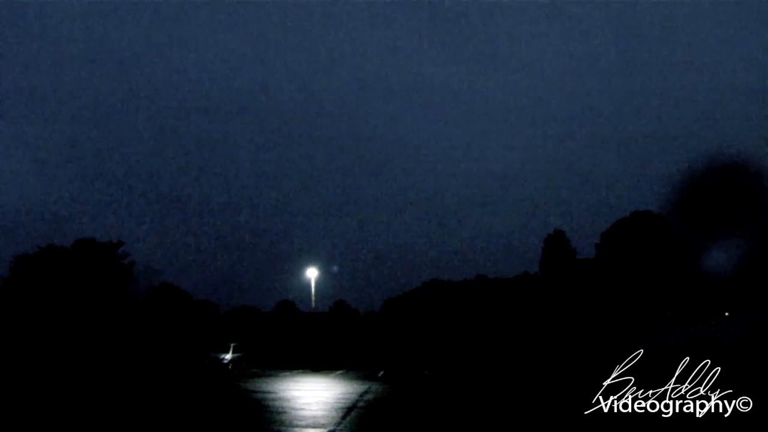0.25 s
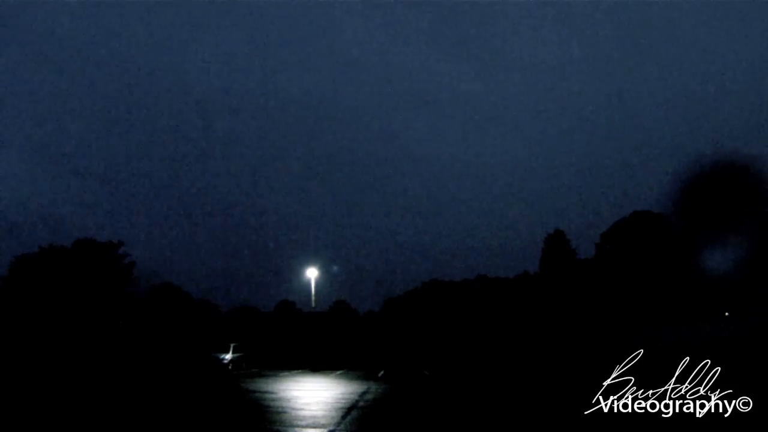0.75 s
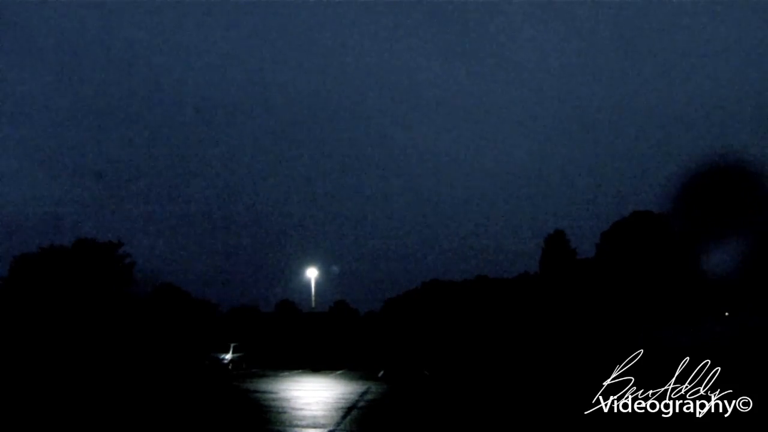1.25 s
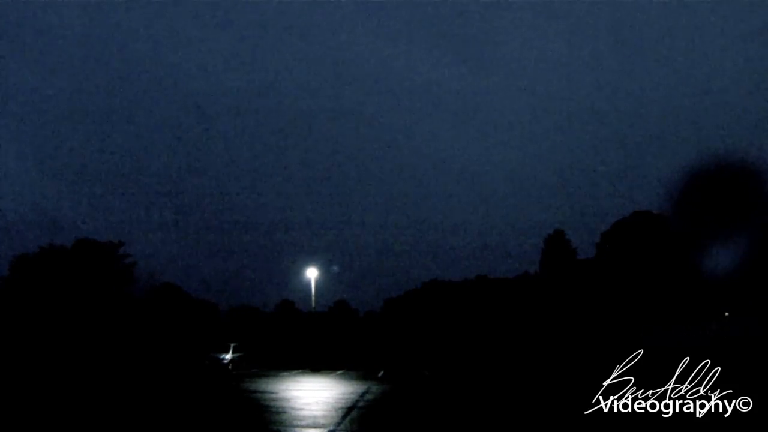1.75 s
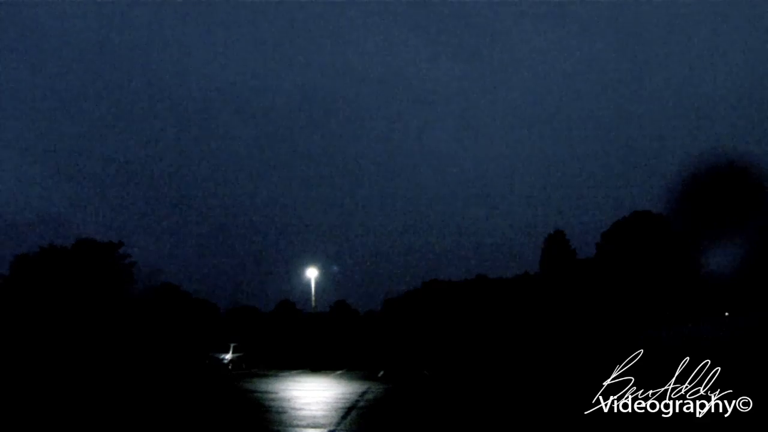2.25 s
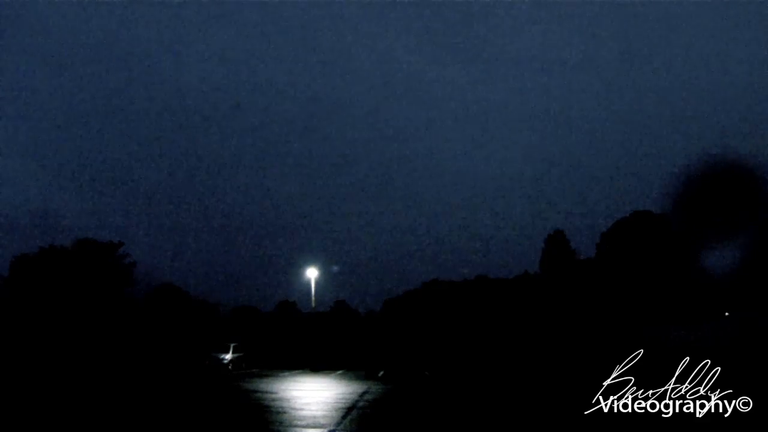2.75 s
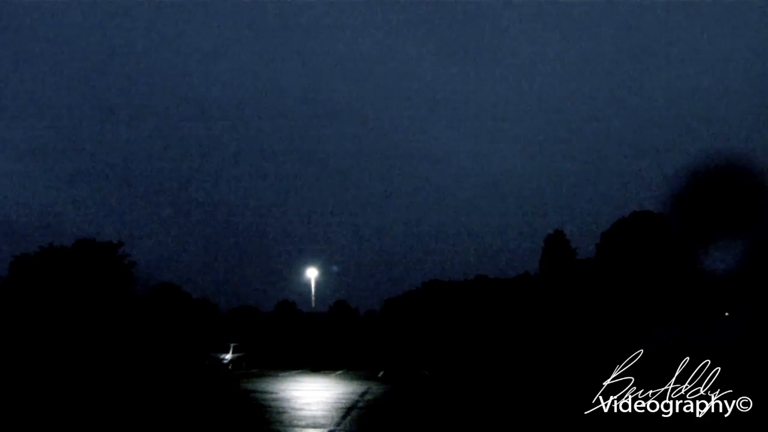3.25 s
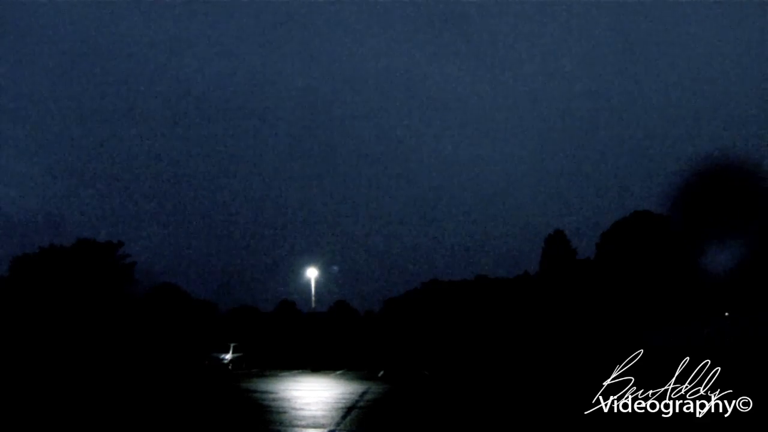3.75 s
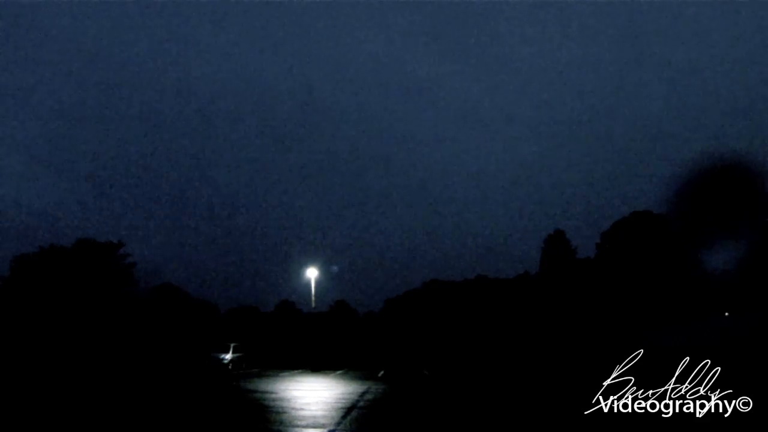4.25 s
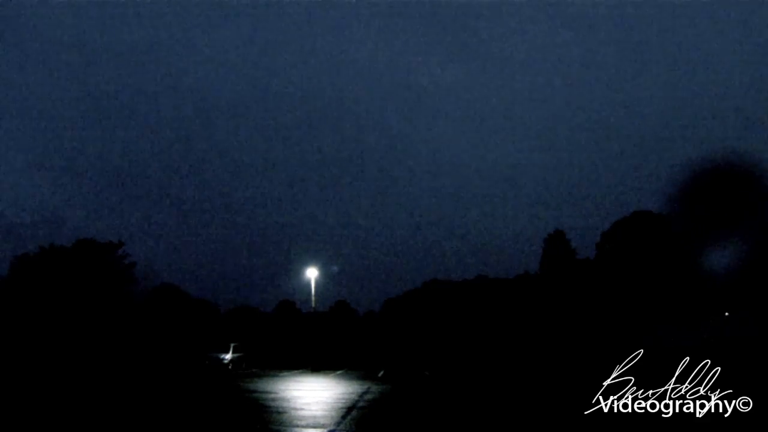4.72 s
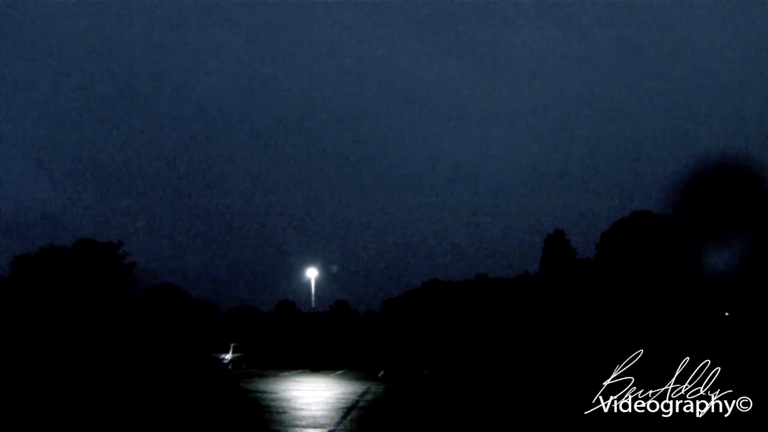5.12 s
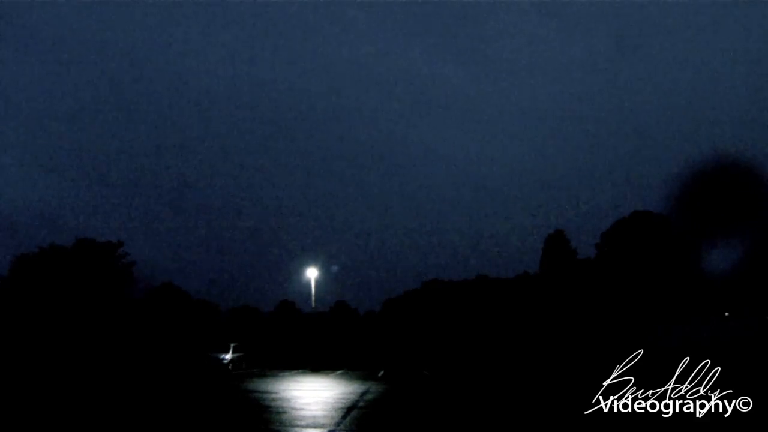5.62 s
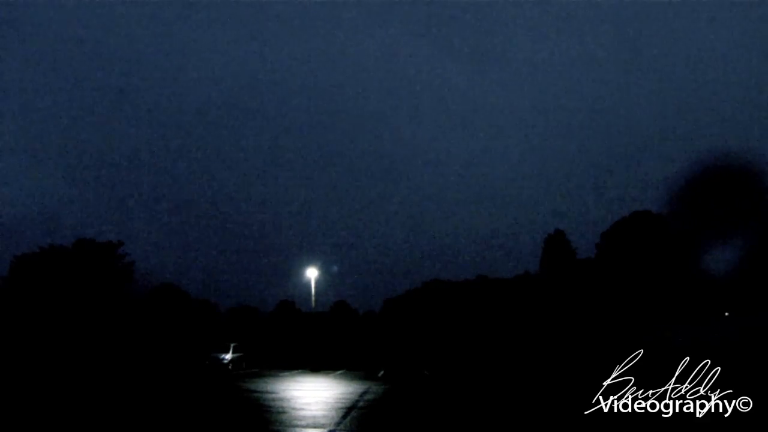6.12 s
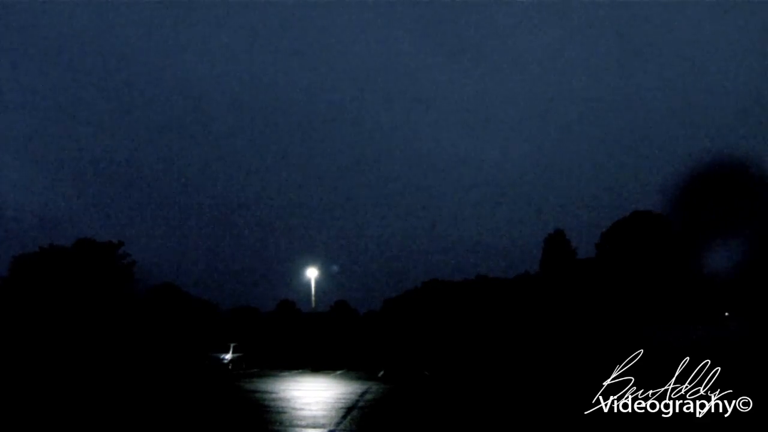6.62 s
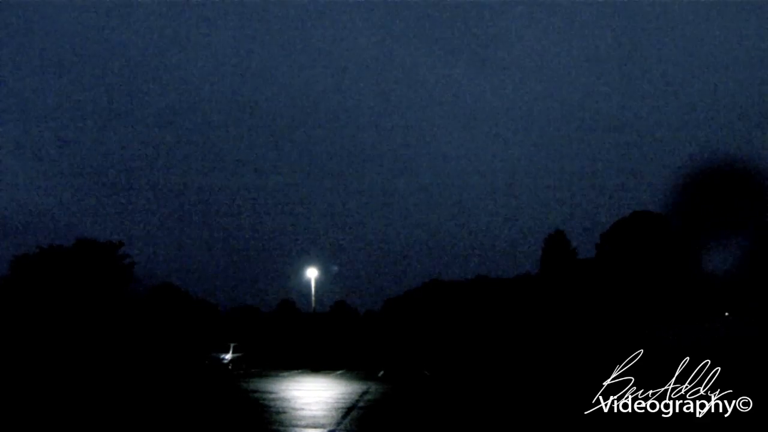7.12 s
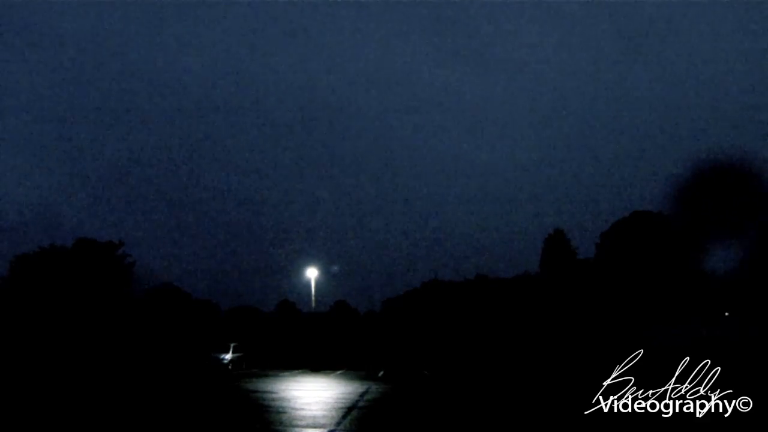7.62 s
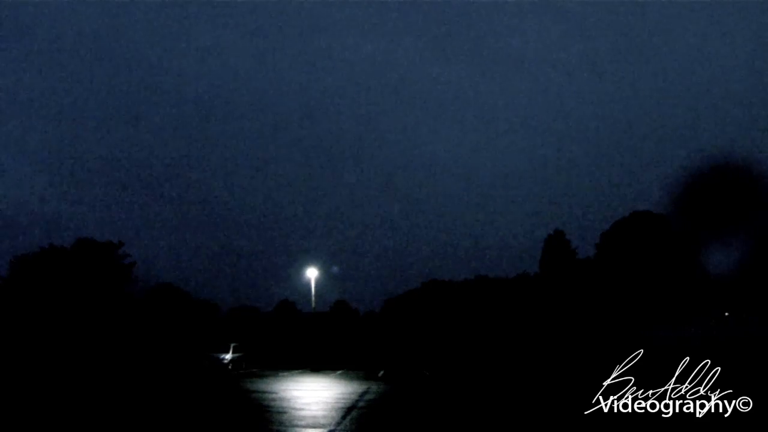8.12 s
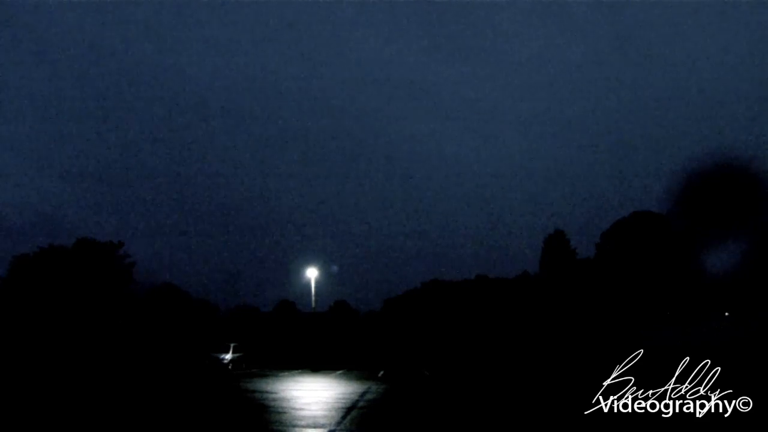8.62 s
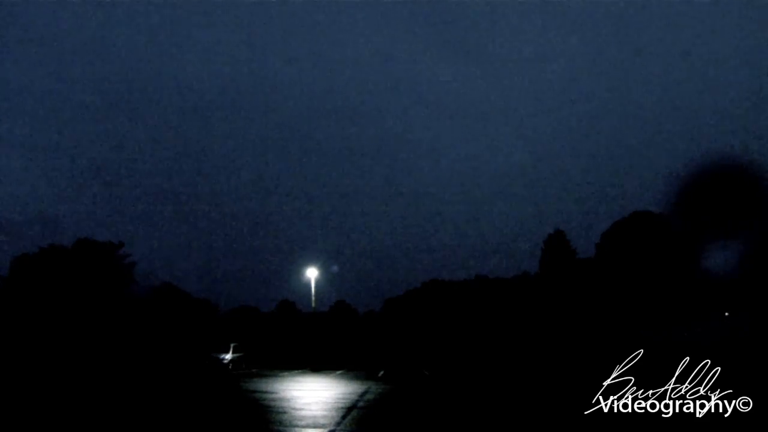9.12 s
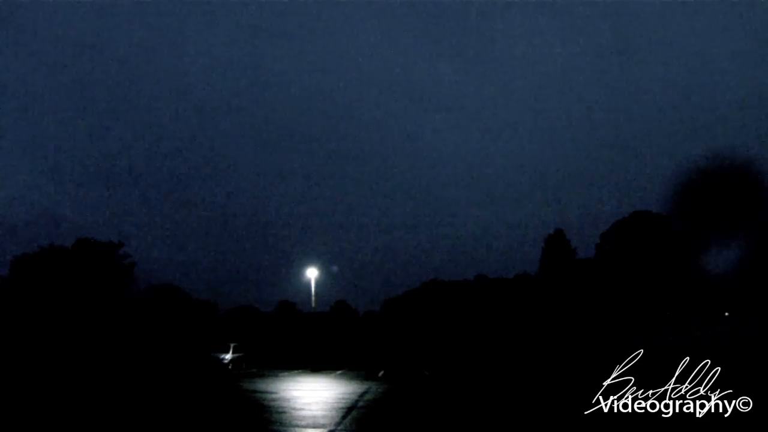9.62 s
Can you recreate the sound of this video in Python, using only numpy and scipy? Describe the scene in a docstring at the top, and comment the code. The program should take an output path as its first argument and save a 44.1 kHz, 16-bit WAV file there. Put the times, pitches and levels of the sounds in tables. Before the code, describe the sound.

Outdoors on a stormy night by lit water, a microphone inside a plastic case hears scattered raindrops strike its shell. A quick cluster of taps comes around one and a half seconds, then faint thunder rumbles low. Afterwards separate drops click irregularly, some soft, some sharp, over barely audible rain hiss. The loudest snap comes right at the end.

```python
"""A thin hiss of light rain runs throughout, with far thunder under it: noise shaped in short-time spectra,
and low noise driving the resonances of a camera's plastic case and its mount on a stormy night.
Scattered drops tap the case from the start: each is a short rough push that rings the case modes,
and the large ones also rock it. The recorder samples slowly and holds each value,
which mirrors every tap into the treble."""
import sys
import numpy as np
from scipy import signal
from scipy.fft import rfft, irfft
from scipy.io import wavfile
from scipy.ndimage import uniform_filter1d

SR = 44100
rng = np.random.default_rng(int(sys.argv[2]) if len(sys.argv) > 2 else 0)


def store_pcm(level_fs):
    """Save levels as 16-bit WAV."""
    pcm = np.round(np.clip(level_fs, -1, 1) * 32767).astype(np.int16)
    wavfile.write(sys.argv[1], SR, np.atleast_2d(pcm).T)


N = 434826

# Spectrum of the light rain: (frequency [Hz], relative density [dB per Hz])
RAIN_SPECTRUM = [(8.8, -26), (15, -12), (80, 2), (166, -5), (218, -6), (429, -11), (888, -15), (981, -12.5),
                 (1540, -19), (2190, -18.5), (4750, -24.5), (5380, -26.5), (5950, -33.5), (7740, -63.5),
                 (13100, -120)]
# Strength of the light rain: (time [s], level [dB])
RAIN_LEVEL = [(0.0, -59.5), (1.3, -60), (2.4, -58.5), (3.3, -59.5), (5.3, -60.5), (9.86, -60.5)]
# Thunder, low part: (time [s], rumble level [dB], mount rocking level [dB])
THUNDER_LEVELS = [(0.0, -75, -59.5), (0.58, -66, -64.5), (1.4, -72, -61.5), (1.62, -51, -51.5),
                  (1.73, -64, -65), (2.03, -57, -48.5), (2.17, -54, -70), (2.25, -59, -51),
                  (2.39, -47, -52), (2.44, -50, -55), (2.5, -44, -44), (2.58, -58, -52), (2.69, -52, -55),
                  (2.77, -52, -45.5), (2.94, -50, -59), (3.02, -54, -44), (3.07, -73, -44),
                  (3.13, -58, -57), (3.21, -64, -45), (3.32, -52, -64), (3.38, -66, -54.5),
                  (3.54, -52.5, -49.5), (3.76, -64, -55), (5.49, -76.5, -70), (5.63, -78, -56),
                  (6.12, -77, -75), (6.26, -86, -68), (9.61, -69, -73), (9.69, -71.5, -48.5),
                  (9.86, -83.5, -55)]
# Resonances driven by the two thunder levels: (frequency [Hz], width of each smoothing [Hz])
THUNDER_MODES = [(28, 36), (81, 14)]
# Two higher modes humming with the strongest thunder: (time [s], mount hum level [dB], panel hum level [dB])
HUM_LEVELS = [(1.75, -68, -72), (2.02, -64.5, -72), (2.18, -75, -82), (2.23, -59.5, -66), (2.4, -69, -55),
              (2.54, -65, -48.5), (2.73, -68.5, -72), (2.86, -51, -72.5), (3.2, -71.5, -66),
              (3.26, -60, -94), (3.32, -73, -67), (3.7, -66, -75), (4.35, -74, -83)]
# Resonances driven by the two hum levels: (frequency [Hz], width of each smoothing [Hz])
HUM_MODES = [(211, 27), (381, 18)]
# Modes of the case on its mount:
# (frequency [Hz], level relative to its part's other modes [dB], t60 before the ring share [s])
CASE_MODES = [(81, -8, .4), (211, 0, .2), (300, -10, .06), (390, -3, .16), (600, -6, .045), (695, -2, .05),
              (745, -2, .05), (830, -1, .045), (890, -2, .045), (980, -4, .045), (1165, 0, .045),
              (1305, -1, .04), (1420, -3, .03), (1660, 0, .026), (1760, -3, .022), (1870, 0, .018),
              (1980, -3, .022), (2210, -3, .028), (2420, 0, .022), (2600, 0, .016), (2740, -4, .02),
              (2960, -8, .028), (3230, -3, .02), (3480, 0, .013), (3800, -9, .036), (4320, -4, .015),
              (4850, 0, .012), (5500, 0, .011)]
# Borders between mount, back, sides, lid, front, rim and lens modes: (frequency [Hz])
PART_BORDERS_HZ = [450, 1050, 1550, 2100, 3000, 4050]
# Large drops and spray: (time [s], blow level [dB], spot, mount level on the blow [dB],
# hardness [dB per octave], ring time [share of t60], three favoured modes [Hz])
DROP_EVENTS = [(0.004, -42, "spray", -9, -4, 1, 394, 1120, 2270),
               (0.433, -45, "front", -8, -2.5, 1.1, 724, 1160, 2530),
               (0.549, -50, "spray", -4, -4, .95, 643, 990, 1710),
               (0.628, -52, "spray", -22, -5.5, .83, 790, 970, 1770),
               (0.838, -48.5, "spray", -17, -3.5, 1.6, 746, 1150, 1670),
               (0.863, -45, "spray", -24, -4, 1.7, 651, 1015, 1760),
               (0.889, -43.5, "spray", -28.5, -3, 1.1, 649, 1040, 2130),
               (0.929, -45.5, "spray", -11, -1.5, .68, 700, 1280, 2460),
               (0.953, -52.5, "side", 3, .2, 0.64, 390, 622, 991),
               (1.046, -40, "top", -19, 5, 1.5, 695, 894, 2100),
               (1.064, -47, "spray", -12, -4, 0.53, 674, 1160, 2430),
               (1.486, -27, "spray", -19, .2, 0.79, 746, 399, 2280),
               (1.504, -35, "spray", -19, -3.5, .95, 786, 1160, 1960),
               (1.518, -20.5, "spray", -26, 1, 0.94, 1480, 2010, 2210),
               (1.538, -35.5, "spray", -14, -2, 0.75, 657, 1080, 1910),
               (1.557, -25, "spray", -36, -0.5, 0.53, 674, 2420, 3810),
               (1.573, -36, "spray", -25, -4, 1.05, 649, 1100, 2220),
               (1.614, -32, "face", -26, -2.5, 0.62, 1450, 1860, 2150),
               (1.66, -32.5, "top", -22, 3, 1.1, 830, 1300, 2600),
               (1.678, -39, "top", -20, 2.5, 0.82, 641, 1160, 2760),
               (1.716, -43.5, "front", -13, 0, 1, 980, 2580, 3730),
               (1.994, -30.5, "front", -27, 1.5, 0.69, 800, 1870, 2360),
               (2.047, -47, "side", -6, 5, .97, 223, 1120, 1730),
               (2.783, -46, "front", -19, 2, 1.1, 603, 1680, 2210),
               (2.962, -35, "front", -14, 3.5, 1.14, 730, 1670, 2510),
               (3.122, -17, "corner", -29, 0.5, 0.56, 830, 900, 2576),
               (3.183, -50.5, "back", -3, 3, .84, 705, 1130, 1700),
               (3.393, -39, "top", -29, 2.5, 1.3, 770, 1700, 2260),
               (3.459, -38.5, "side", -17, 5, .9, 1170, 1750, 3200),
               (3.519, -49.5, "top", -4, 1.5, 0.83, 751, 1940, 2570),
               (3.593, -52.5, "lid", -12, 0, .83, 1210, 1690, 2620),
               (3.716, -44, "side", -5, .8, 0.68, 600, 1170, 2230),
               (3.837, -39, "corner", -21, -2.5, 0.7, 1170, 2750, 3480),
               (4.001, -40, "rim", -19, -2, 0.69, 830, 1810, 3380),
               (4.093, -49, "corner", -22, 3, 1.1, 2100, 2250, 3420),
               (4.498, -12, "top", -30.5, 0, 1.08, 716, 830, 1813),
               (4.565, -44, "front", -10.5, 4, 0.59, 1630, 2420, 4850),
               (4.64, -49, "spray", -20, 1, 0.97, 1980, 2420, 2600),
               (4.870, -23, "face", -27.5, -5.5, 0.55, 590, 1150, 1880),
               (5.567, -33, "back", -12, -1.2, 0.95, 766, 1150, 1710),
               (5.715, -15, "rim", -18.5, 0.5, 0.86, 217.4, 1330, 3270),
               (5.816, -22, "top", -27.5, 2.2, 1.13, 618, 982, 1820),
               (5.889, -53.5, "lid", -16, -2, 0.76, 1165, 1980, 2600),
               (6.175, -14.5, "face", -53, 2.5, 0.9, 2520, 2750, 4320),
               (6.348, -49, "side", -21, 0, 0.76, 725, 1270, 1710),
               (6.526, -54.5, "side", 4.5, 2.5, 0.69, 390, 735, 1230),
               (6.603, -36, "lid", -24, 0, 1.07, 1300, 2020, 2360),
               (6.985, -33, "side", -17.5, -2.2, 0.85, 735, 1170, 2600),
               (7.027, -47, "top", -28, -1, 1.1, 743, 840, 2550),
               (7.089, -41, "back", -15, 2, 1, 725, 1150, 1720),
               (7.299, -43.5, "side", -10, -1, 0.46, 450, 1150, 1710),
               (7.608, -18, "face", -33, -2, 0.8, 600, 1705, 2160),
               (7.699, -41.5, "side", -13, 0.5, 1.6, 390, 695, 1270),
               (7.768, -54, "lid", -20, 2, .9, 1165, 1870, 2420),
               (7.858, -26.5, "face", -28, -2.1, 0.9, 1000, 1725, 2290),
               (7.903, -49, "lid", -16, -3, 1.5, 643, 1000, 3360),
               (7.96, -48.5, "lid", -12, -3, 1.3, 884, 1810, 2590),
               (8.055, -31, "lid", -33, 2.2, 0.55, 1200, 1740, 2220),
               (8.248, -50, "side", -12, 0, .9, 1160, 1290, 1820),
               (8.3609, -10.5, "face", -42, 0.4, 0.92, 1200, 2430, 2960),
               (8.817, -14.5, "top", -38, 1.8, 1.1, 686, 890, 1703),
               (9.167, -52.5, "top", -19, -1.5, .9, 592, 980, 2060),
               (9.407, -27.5, "top", -30, 0.8, 0.84, 758, 887, 1786),
               (9.636, -28, "face", -25.5, -6, 0.8, 610, 1900, 5500),
               (9.6724, 4, "face", -42, 2.3, 0.58, 1660, 2454, 2553)]
# Where a drop lands: (back, sides, lid, front, rim, lens, shove of the whole case [all dB on the blow],
# rise [ms, at 2 kHz, at least 0.05], spreading [ms, at least 0.05]).
# "face" is square on, by the microphone: a snap; "spray" is blown across the whole case
LANDING_SPOTS = {"top": (-8, -16.5, -12, -17.5, -24, -48, -30, 2.5, 0.77),
                 "side": (-12.5, -9.5, -19, -20, -23, -39, -28, 3, 1.13),
                 "front": (-16.5, -19, -12, -11, -19.5, -40, -42, 1, 1.65),
                 "lid": (-15.5, -13, -6, -15.5, -19, -23.5, -28, 0.9, 1.5),
                 "corner": (-15, -19, -17, -5.5, -11.5, -41, -34, 3.5, 1.5),
                 "back": (-10.5, -8, -11, -23, -39, -40, -21, 1, 0.5),
                 "rim": (-22.5, -14, -14, -13.5, -11.5, -26, -31, 1.7, 1.66),
                 "face": (-26.5, -22, -13, -8.5, -18, -25.5, -27.5, -0.23, 0.3),
                 "spray": (-15, -13.5, -12.5, -10.5, -14.5, -26, -16, 0.5, 8.5)}
# Spectrum of the hiss between the channels: (frequency [Hz], relative density [dB per Hz])
HISS_SPECTRUM = [(35, -40.5), (60, -23.5), (195, -7), (1710, -2.5), (4410, -3), (5950, -10.5), (8620, -8),
                 (10100, -31), (15000, -32)]

ROLL_DB, ROLLS_PER_S = 3, 7.0  # thunder comes in uneven rolls
COMPACT = .5  # weight of the single blow on the rough push, at one ms of spreading
CREST_DB, FAVOUR_DB = 12, 2  # lift of a favoured mode within its part, and of the part holding it
THUMP_MS = 0.4  # time scale of the shove of the whole case
ROCK_HZ, ROCK_RISE_S, ROCK_T60_S = 80.8, .03, 0.75
ROCK_DB, ROCK_SHARE = -37, 0.5  # rocking level, plus this share of the shove level in dB
FINE_PER_S, FINE_DB = 7.4, -67  # small drops: level near that of the softest; a random draw makes a few much louder
HISS_DB = -79.5
HOLD_HZ, OVERLOAD = 12000, .82  # slow sampling rate, clipping height
DULL_HZ, EDGE_HZ = 15450, 16500  # gentle and steep low-pass


def gain_of(db):
    """A level in decibels is twenty times the logarithm of an amplitude ratio."""
    return 10 ** (np.asarray(db) / 20)


def evened(x):
    """Dividing by the root mean square gives a signal unit effective strength."""
    return x / np.sqrt(np.mean(x ** 2) + 1e-20)


def rain():
    """Spectral shaping: random short-time spectra with drifting patches and a flicker where far drops land."""
    frames, hz = N // 256 + 5, np.fft.rfftfreq(1024, 1 / SR)
    real, imaginary, patches = rng.standard_normal((frames, 513, 3)).T
    patches = uniform_filter1d(patches, 14, 0)  # across frequency
    patches = evened(uniform_filter1d(patches, 10, 1))  # across time
    flicker = rng.standard_normal(frames)
    f, db = np.transpose(RAIN_SPECTRUM)
    colour_db = np.interp(np.log(hz + 1), np.log(f + 1), db, right=-100)
    spectra = (real + 1j * imaginary) * gain_of(colour_db[:, None] + 1.1 * patches + .7 * flicker)
    noise = signal.istft(spectra, nperseg=1024, noverlap=768)[1][:N]
    level_db = np.interp(np.arange(N) / SR, *np.transpose(RAIN_LEVEL))
    return gain_of(level_db) * evened(noise)


def resonate(x, hz, width):
    """Heterodyne resonator: shifts hz down to zero, smooths, and shifts back."""
    turn = np.exp(2j * np.pi * hz * np.arange(len(x)) / SR)
    r = np.exp(-np.pi * width / SR)
    return 2 * (turn * signal.lfilter([1 - r], [1, -r], x / turn)).real


def shaken(curves, modes):
    """Forced vibration: low noise drives narrow resonances, which hum unevenly."""
    s, *levels = np.transpose(curves)
    out, t = np.zeros(N), np.arange(N) / SR
    for (hz, width), db in zip(modes, levels):
        hum = resonate(resonate(rng.standard_normal(N), hz, width), hz, width)
        swing = np.sqrt(uniform_filter1d(hum ** 2, round(2 * SR / hz)) + 1e-12)
        damped = evened(hum / swing ** 0.4)  # large swings meet more damping
        rolls = np.interp(t * ROLLS_PER_S, np.arange(200), rng.standard_normal(200))
        roll = evened(gain_of(ROLL_DB * rolls))
        out += gain_of(np.interp(t, s, db, left=-100, right=-100)) * roll * damped
    return out


def thunder():
    """Structure-borne sound: the far rolls reach the microphone mostly through the mount."""
    return shaken(THUNDER_LEVELS, THUNDER_MODES) + shaken(HUM_LEVELS, HUM_MODES)


def add(mix, s, sound):
    """Superposition: a sound starting at s seconds adds to the mix."""
    part = mix[round(s * SR):][:len(sound)]
    part += sound[:len(part)]


def loudest(x):
    """Equivalent amplitude: height of a sine as strong as the strongest five milliseconds."""
    return np.sqrt(2 * uniform_filter1d(x ** 2, SR // 200).max())


def drop_push(hz, spread_ms):
    """Impact excitation: the water lands and spreads as a short rough push, plus one blow at each mode."""
    t = np.arange(SR // 16) / SR
    u = t / (spread_ms / 1000)
    swell = (1 - np.exp(-6.0 * u)) * np.exp(-u)
    blow = np.cos(2 * np.pi * (hz * t + rng.random(hz.shape)))
    # a compact drop reaches every mode as one blow
    return swell * (rng.standard_normal(len(u)) + COMPACT / spread_ms ** 1.5 * blow)


def tap(blow_db, mount_db, hard_db, ring_share, favoured_hz, *spot):
    """Modal superposition: a drop's push makes each part of the case ring with its own modes."""
    *panels_db, thump_db, rise_ms, spread_ms = spot
    rise_ms, spread_ms = max(rise_ms, .05), max(spread_ms, .05)
    parts_db = [mount_db, *(panels_db + hard_db * np.log2(np.divide(PART_BORDERS_HZ, 1550)))]
    t = np.arange(SR // 5) / SR
    hz, mode_db, t60 = np.transpose(CASE_MODES)[:, :, None]

    rise_s = rise_ms / 1000 * (2000 / hz) ** 0.17  # low modes build slower
    rise = np.sin(np.pi / 2 * np.minimum(t / rise_s, 1)) ** 2
    decay = gain_of(-60 * t / (t60 * max(ring_share, .2)))
    ringing = rise * decay * np.sin(2 * np.pi * hz * t)
    rings = signal.fftconvolve(ringing, drop_push(hz, spread_ms), axes=1)[:, :len(t)]
    rings /= abs(rings).max(axis=1, keepdims=True)

    # the exact point hit favours a few modes, and the parts that hold them
    crest = np.max([np.exp(-(np.log(hz / f) / .045) ** 2) for f in favoured_hz], axis=0)
    rings *= gain_of(mode_db + CREST_DB * crest)
    part_of_mode = np.searchsorted(PART_BORDERS_HZ, hz[:, 0])

    # the whole case is shoved and springs back
    shove = t / (THUMP_MS / 1000)
    sound = gain_of(thump_db) * np.e * shove * (1 - shove / 2) * np.exp(-shove)
    for k, part_db in enumerate(parts_db):
        members = part_of_mode == k
        ring = rings[members].sum(axis=0)
        lift_db = FAVOUR_DB * crest[members].max()
        sound += gain_of(part_db + lift_db) * ring / loudest(ring)
    return gain_of(blow_db) * sound


def rocking(shove_db):
    """Damped oscillation: the case sways on its mount after a blow."""
    t = np.arange(SR // 2) / SR
    decay = gain_of(ROCK_DB + ROCK_SHARE * shove_db - 60 * t / ROCK_T60_S)
    return decay * (1 - np.exp(-t / ROCK_RISE_S)) * np.sin(2 * np.pi * ROCK_HZ * t)


def small_drops():
    """Random arrivals: small drops tap at random moments and spots, few of them strong."""
    out = np.zeros(N)
    mean_parts_db = np.array([-37.5, -12.0, -11.5, -4.5, -11, -17.0, -27.0])  # mount, then panels
    for when, softness, spot in rng.random((int(FINE_PER_S * N / SR), 3)):
        mount_db, *panels_db = mean_parts_db + 4.0 * rng.standard_normal(len(mean_parts_db))
        favoured_hz = np.array([600, 900, 1610, 2185]) * (1 + spot / 3)
        blow_db = FINE_DB - 3.8 * np.log(softness + 0.025)
        add(out, when * N / SR, tap(blow_db, mount_db, 0, 1, favoured_hz, *panels_db, -26, 3.6, 2.7))
    return out


def drops():
    """Impulse response: large drops and spray ring and rock the case; small drops only ring and shove it."""
    out = np.zeros(N)
    for s, blow_db, spot, mount_db, hard_db, ring_share, *favoured_hz in DROP_EVENTS:
        landing = LANDING_SPOTS[spot]
        add(out, s, tap(blow_db, mount_db, hard_db, ring_share, favoured_hz, *landing))
        add(out, s, rocking(blow_db + landing[-3]))
    return out + small_drops()


def channel_hiss():
    """Antiphase noise: a faint shaped hiss has opposite sign in the two channels."""
    hz = np.fft.rfftfreq(N, 1 / SR)
    f, db = np.transpose(HISS_SPECTRUM)
    colour = gain_of(np.interp(np.log(hz + 1), np.log(f + 1), db))
    hiss = irfft(rfft(rng.standard_normal(N)) * colour, N)
    return gain_of(HISS_DB) * evened(hiss) * np.array([[1], [-1]])


def scene():
    """Superposition at one point: one microphone inside the case feeds both channels."""
    return np.tile(rain() + thunder() + drops(), (2, 1))


def record(dry):
    """Sample and hold: slow sampling, overload, each value held four steps, hiss, a dull top, a band limit."""
    slow = signal.resample_poly(dry, HOLD_HZ, SR, axis=1)
    slow = np.clip(slow, -OVERLOAD, OVERLOAD)
    stepped = np.repeat(slow, 4, axis=1)  # holding leaves mirror images in the treble
    held = signal.resample_poly(stepped, SR, 4 * HOLD_HZ, axis=1)[:, :N] + channel_hiss()
    gentle = signal.firwin(121, DULL_HZ, window=("kaiser", 1.5), fs=SR)
    steep = signal.firwin(511, EDGE_HZ, window=("kaiser", 9), fs=SR)
    dull = signal.oaconvolve(held, gentle[None], "same")
    return signal.oaconvolve(dull, steep[None], "same")


dry = scene()
out = record(dry)
store_pcm(out)
```